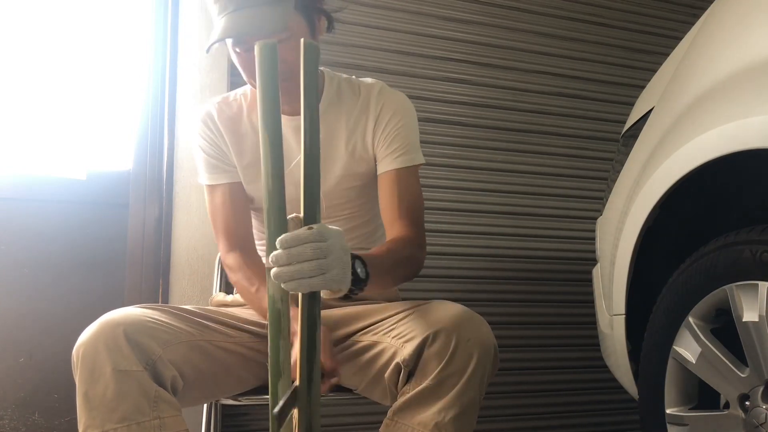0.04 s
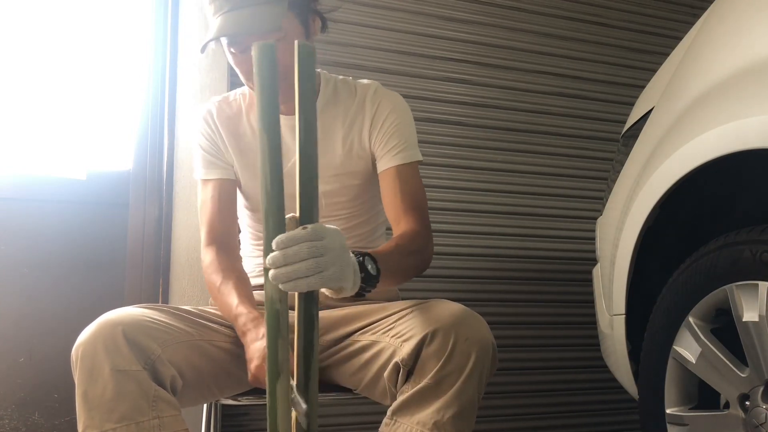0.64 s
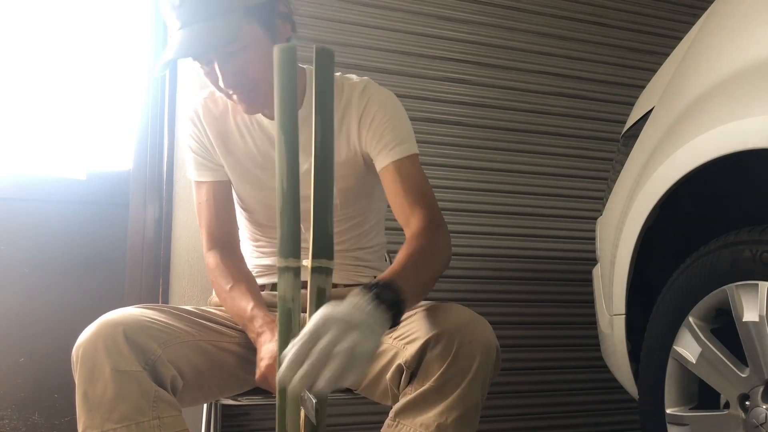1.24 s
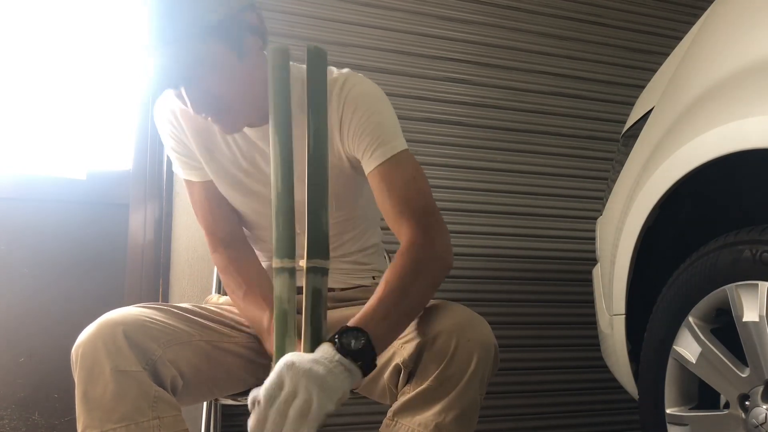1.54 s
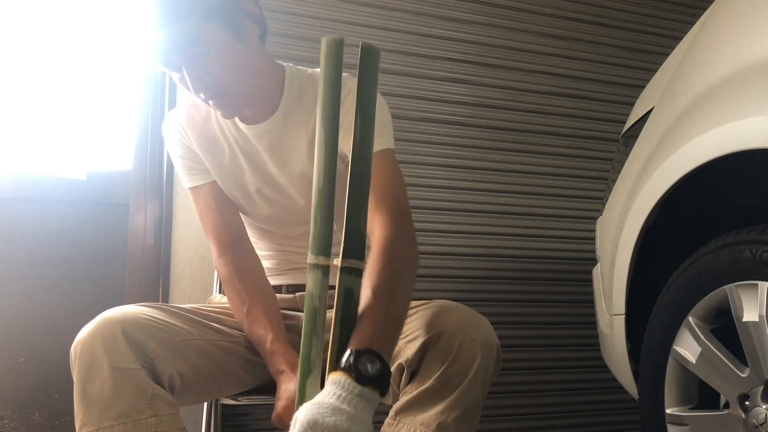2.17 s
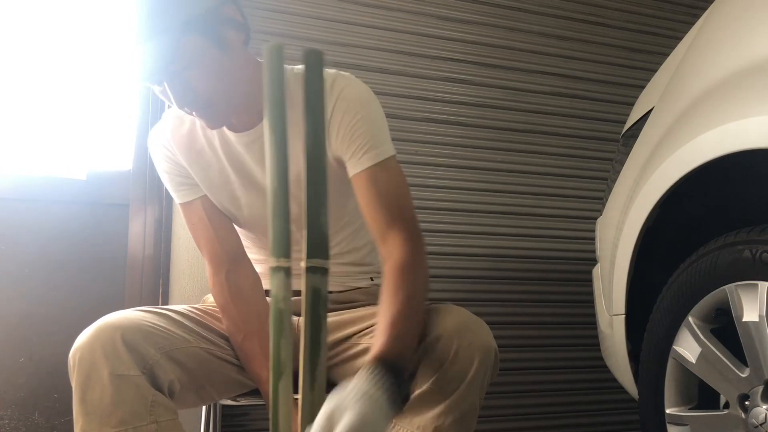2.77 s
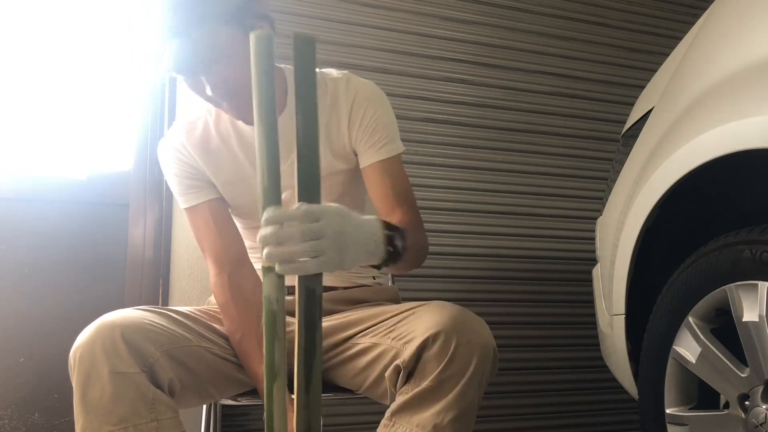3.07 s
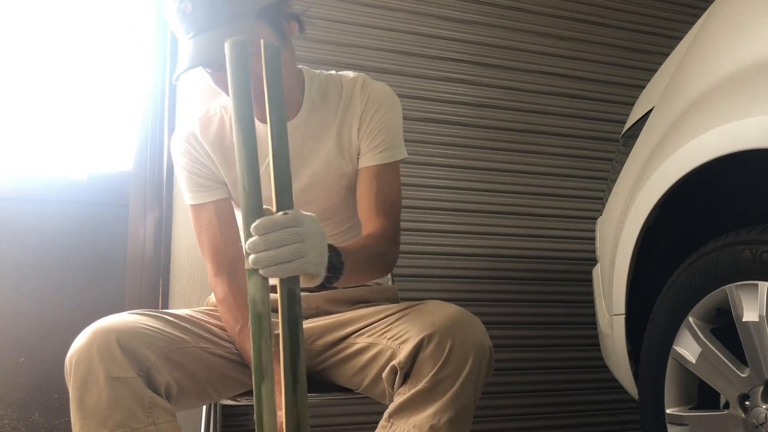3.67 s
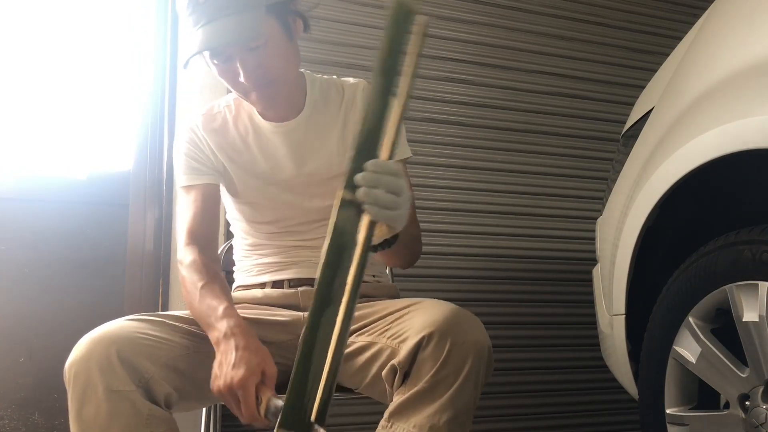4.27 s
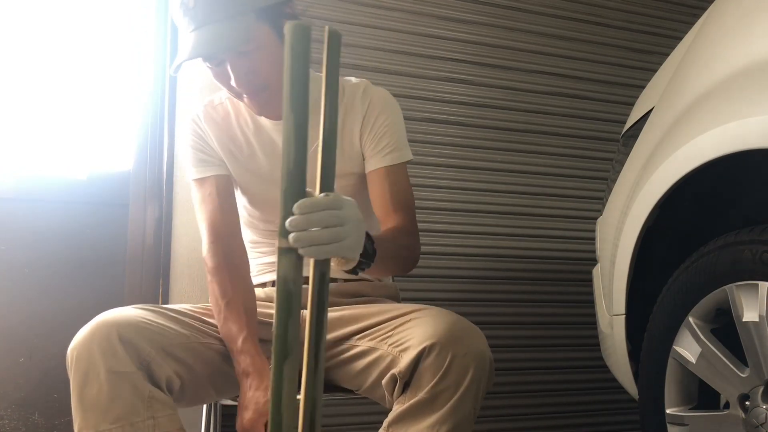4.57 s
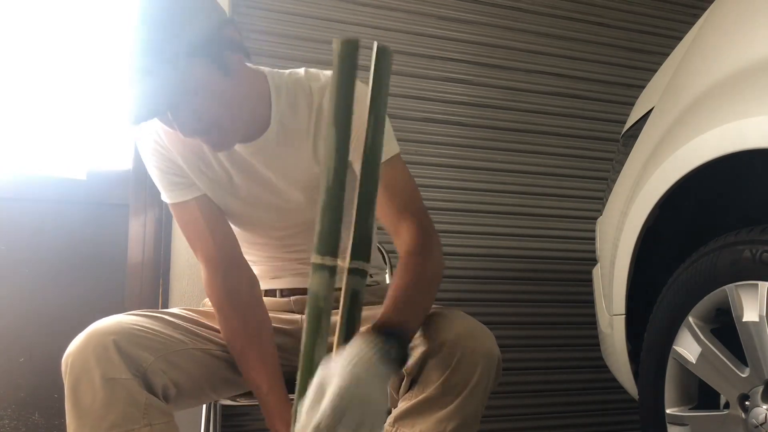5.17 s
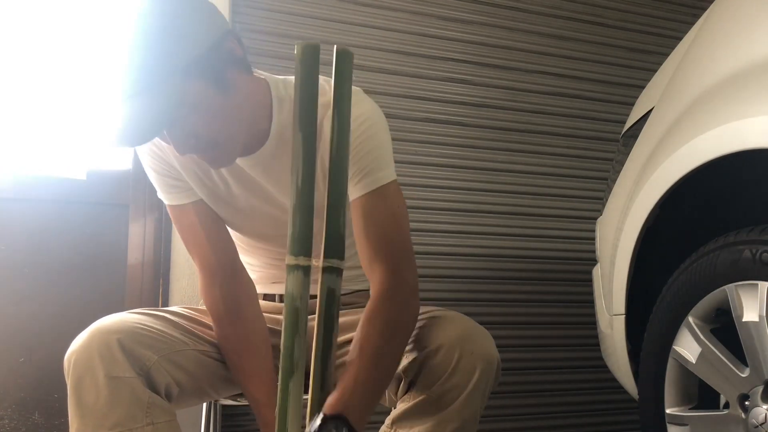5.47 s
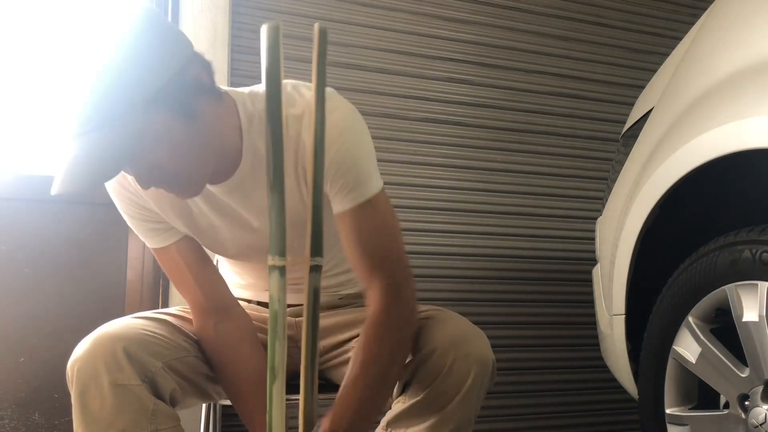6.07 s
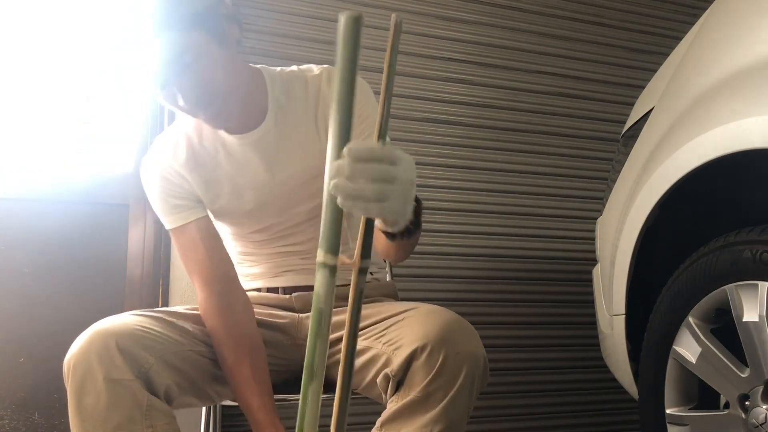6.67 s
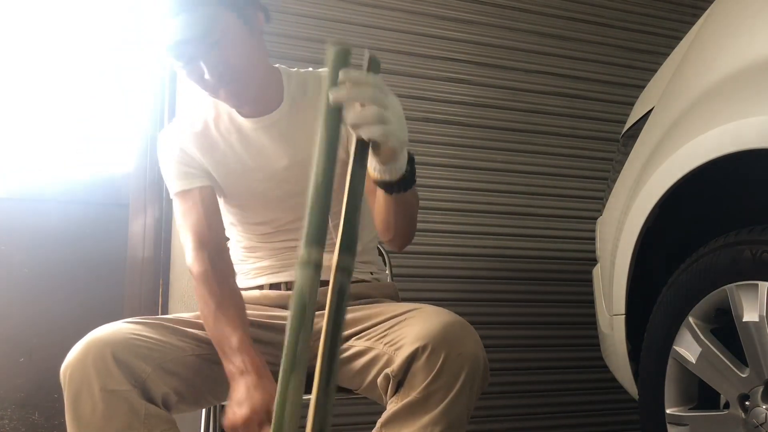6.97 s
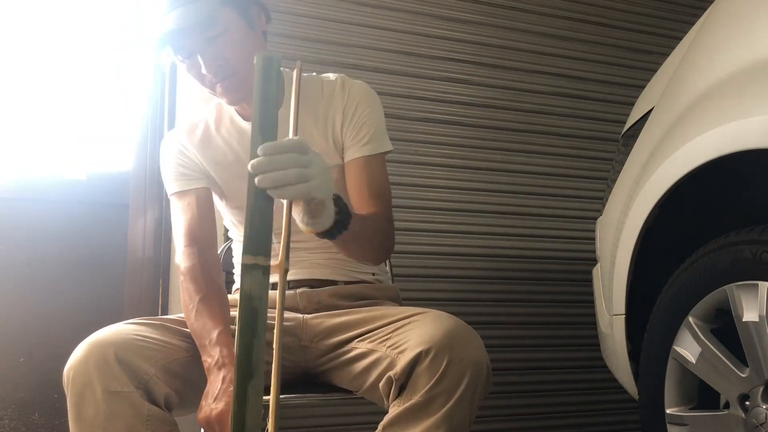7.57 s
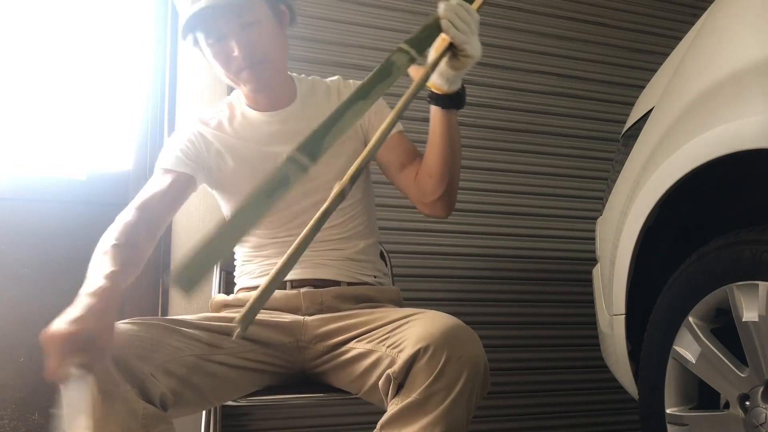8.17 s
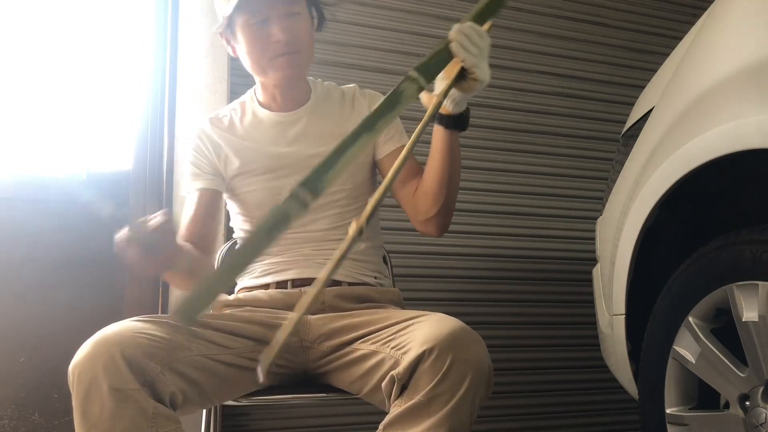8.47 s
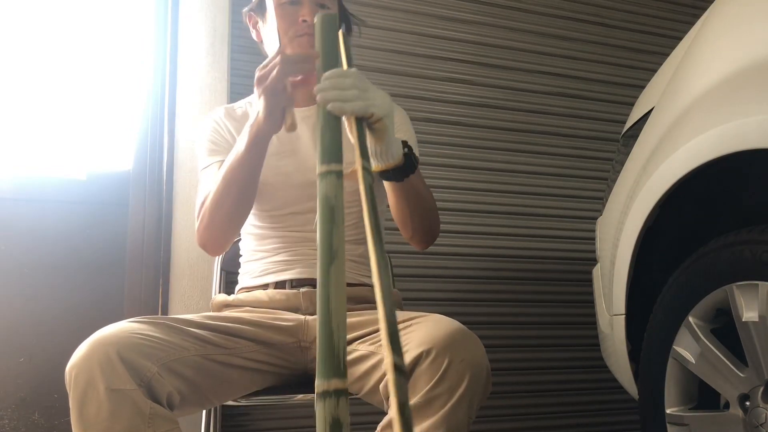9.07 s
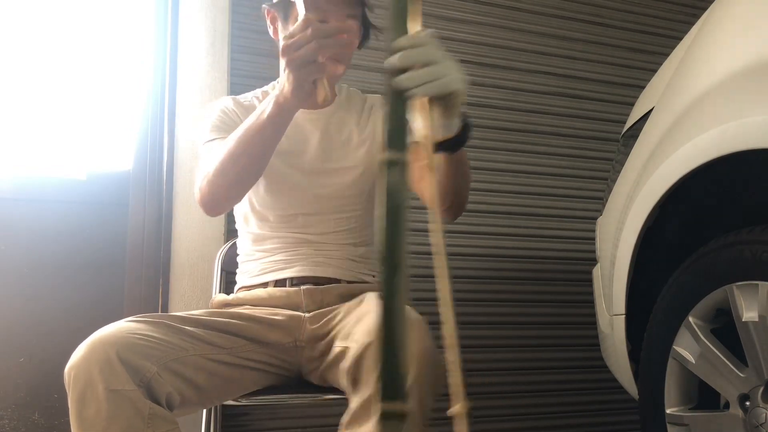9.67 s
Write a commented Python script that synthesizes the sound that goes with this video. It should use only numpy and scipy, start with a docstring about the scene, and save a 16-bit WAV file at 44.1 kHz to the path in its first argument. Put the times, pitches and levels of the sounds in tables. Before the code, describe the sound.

A green bamboo pole is split along the grain with a knife in a garage. Hollow knocks come first, then a loud crack and clusters of snapping, fizzing fibres. More knocks and soft low bumps fall between the tearing runs, with brief wet squeaks and faint glove rustles, before a few last cracks. The hard walls add a short echo over a faint rumble and machine hum.

```python
"""In a garage, a green bamboo pole is split along the grain with a knife.
Fibres tear in fizzing runs and bundles let go in sharp cracks; these and blunt knocks excite the
modes of the hollow tube. The wet faces of the split squeak by stick and slip, the foot of the pole
bumps and the grip rustles. Hard walls reflect the pole's sound over a faint rumble and machine hum."""
import sys
import numpy as np
from scipy import signal
from scipy.fft import rfft, irfft
from scipy.io import wavfile
from scipy.ndimage import uniform_filter1d

SR = 44100
rng = np.random.default_rng(int(sys.argv[2]) if len(sys.argv) > 2 else 0)


def wav_out(sig):
    """Save sig, one row per channel (or a flat mono array), as 16-bit PCM at SR to the path in sys.argv[1]."""
    wavfile.write(sys.argv[1], SR, np.round(np.clip(np.atleast_2d(sig).T, -1, 1) * 32767).astype(np.int16))


N = 433944

# spectrum of the distant rumble: f/Hz, level/dB
RUMBLE_SPECTRUM = [(20, -25), (40, -5), (75, 1.5), (115, -2.5), (180, -6.5), (290, -4), (430, -3),
                   (600, -9.5), (820, -6), (1400, -12), (2600, -21), (5000, -28), (9000, -35),
                   (15500, -36.5)]
# partials of the machine hum: f/Hz, level/dB
HUM_PARTIALS = [(59.2, -73), (251.5, -77.5), (294, -74.5)]
# blunt knocks on the pole: t/s, level/dB, thud/dB, hollow note f/Hz
KNOCKS = [(0.0, -24.5, -15.5, 730), (0.166, -22, -12.5, 1120), (0.1674, -22.5, -10.5, 1450),
          (1.641, -20.5, -9.5, 800), (2.003, -41, 0, 950), (3.059, -35.5, -2.5, 1107),
          (3.372, -41.5, 0, 870), (5.755, -25.5, 0.5, 745), (5.757, -28.5, -1.5, 560), (6.992, -33, 9, 390),
          (7.037, -27, -6, 1676), (7.057, -32, 0, 1250)]
# modes of the hollow pole: f/Hz, bandwidth/Hz, level/dB
POLE_MODES = [(522, 37, 6), (727, 67, 3.5), (869, 12, 4.5), (1070, 80, 1.5), (1452, 180, 1.5),
              (1840, 260, -3), (2460, 190, 5), (3270, 200, -0.5), (3805, 100, -0.5), (4184, 190, -1.5),
              (4795, 116, -2), (5700, 270, -4.5), (8200, 400, -2)]
# reverberation time of the garage: f/Hz, t60/s
ROOM_T60 = [(150, 0.45), (1200, 0.4745), (8000, 0.4656), (15000, 0.3)]
# strength of its echoes: f/Hz, level/dB
ROOM_SPECTRUM = [(150, 1), (500, -0.5), (1200, -4.5), (4000, -2.5), (8000, -6), (15000, -7)]
# bundles snapping: t/s, level/dB, brightness/dB (fine fibres above 0, thick below), strip note f/Hz
CRACKS = [(0.15, -51.5, 4, 1500), (1.59, -47, -1, 3480), (1.62, -43.5, 1, 2500), (1.6394, -25.5, -5, 1740),
          (1.6411, -24, 2.5, 2670), (1.702, -42, -7, 1500), (1.9976, -57.5, 1, 1500),
          (2.2294, -57.5, 0, 1540), (2.3707, -55.5, 1, 1510), (2.43, -44.5, -2, 5700),
          (2.4396, -36.5, 0.5, 1770), (2.4855, -28, -2.5, 2330), (2.503, -31, 2.5, 4170),
          (2.602, -38, 2, 4100), (2.6447, -47, 3, 1930), (2.934, -60.5, 4.5, 7100),
          (3.3482, -60, 2.5, 2360), (3.435, -44, -2, 1780), (3.472, -42, -1, 1800),
          (3.4944, -42, -1.5, 4000), (3.5175, -42.5, -2, 1950), (3.547, -40.5, -2.5, 1850),
          (3.5753, -40.5, -2.5, 4200), (5.15, -55, 6.5, 3840), (5.1768, -41, 3, 4000),
          (5.25, -53.5, 10, 6350), (5.306, -52, -2, 8000), (5.534, -59, -9.5, 1500),
          (5.6966, -43.5, 1, 4000), (5.7535, -39, 6.5, 6300), (5.8317, -45.5, -4, 3300),
          (5.987, -45.5, 4, 4400), (6.0377, -56, 8.5, 2190), (7.156, -42.5, 2, 5530),
          (7.293, -55, -2, 2010), (7.7716, -59, 6, 3500), (8.115, -38.5, -2.5, 2550),
          (8.1253, -48, -4, 2450), (8.3169, -50, -2.5, 4700)]
# the foot of the pole taking the weight: t/s, level/dB, f/Hz, t60/s
BUMPS = [(0.166, -51.5, 215, 0.18), (2.47, -49.5, 79.4, 0.46), (2.851, -47.5, 259, 0.21),
         (3.375, -52, 273, 0.33), (5.69, -55, 295, 0.16), (5.755, -53, 85, 0.27), (6.994, -59, 128, 0.5),
         (6.992, -50, 228, 0.23)]
# glove and cloth brushing the pole: t/s, duration/s, level/dB
RUSTLES = [(0.846, 0.76, -77), (6.398, 0.65, -67.5), (7.259, 0.95, -72.5), (8.204, 0.48, -71)]
# wet faces slipping: t/s, duration/s, final level/dB, f/Hz, first gap between slips/s, build-up/dB
SQUEAKS = [(1.036, .012, -61, 7700, 0.0067, 3), (1.31, 0.028, -59, 7900, 0.0086, 6),
           (1.481, 0.03, -55, 7900, 0.0077, 0), (6.298, 0.0082, -57, 2970, 0.0055, 4),
           (6.438, 0.043, -48, 2826, .0074, 8), (6.574, 0.099, -56.5, 2810, 0.011, 4)]
# runs of tearing fibres: t/s, duration/s, peak level/dB, share of the run spent building up,
# woody middle/dB, fizzy edge/dB, strip note f/Hz
TEARS = [(1.573, 0.052, -49, 0.82, 7, 3, 1310), (2.435, 0.05, -41, 0.25, -1, 5, 1440),
         (2.474, 0.049, -34, 0.079, -1, 1, 2400), (3.398, 0.12, -40, 0.17, -1, 1, 830),
         (3.497, 0.11, -47.5, 0.11, -10, 0, 809), (3.8, 0.052, -48, 0.073, 0.5, 1.5, 1750),
         (3.957, 0.13, -48, 0.91, -1, 0.5, 1080), (4.466, 0.11, -59, 0.83, -1, 2, 948),
         (4.791, 0.076, -44.5, 0.54, -3, 0.5, 2260), (4.948, 0.15, -41, 0.46, -6, 3, 1570),
         (5.092, 0.25, -58.5, 0.078, -5, 2, 3170), (5.604, 0.042, -47.5, 0.57, 0.5, -8, 1830),
         (5.689, 0.077, -46.5, 0.55, 1.5, 5, 1384), (5.762, 0.22, -58, 0.51, 6, 2, 1107),
         (6.719, 0.1, -52.5, 0.72, 5.5, 1, 990), (6.989, 0.033, -41, 0.14, 5, 3, 420),
         (8.056, 0.042, -43.5, 0.12, 3.5, 3, 2180), (8.547, 0.019, -52, .1, 4, 4, 950)]
# spectra of the three excitations: f/Hz, level/dB
KNOCK_SPECTRUM = [(60, -28), (170, -8.5), (350, 2), (620, -5.5), (1200, -4), (2200, -9), (3200, -4),
                  (5000, 3), (9000, -4), (15500, -9.5)]
CRACK_SPECTRUM = [(60, -25), (200, -12.5), (450, -12), (900, -1.5), (2000, -0.5), (3200, -3), (6000, 0.5),
                  (9000, -2), (15500, -1.5)]
TEAR_SPECTRUM = [(100, -19), (320, -10), (560, -12.5), (830, -3.5), (2000, -2), (4000, 1.5), (5500, 1),
                 (7800, -1), (9500, -4), (15500, -6.5)]

BAND_LIMIT_HZ = 16000
FIRM_DB = -40  # reference level of a firm blow


def gain_of(db):
    """Amplitude grows tenfold for every 20 dB."""
    return 10 ** (np.asarray(db) / 20)


def unit_rms(x):
    """Normalisation to a mean power of 1."""
    return x / np.sqrt(np.mean(x ** 2) + 1e-20)


def curve_at(points, hz):
    """Linear interpolation of (f/Hz, value) points on a logarithmic frequency axis."""
    f, value = np.transpose(points)
    return np.interp(np.log(hz + 1), np.log(f + 1), value)


def add(mix, start, sound):
    """Superposition: a sound joins the mix at its start time in seconds."""
    part = mix[max(round(start * SR), 0):][:len(sound)]
    part += sound[:len(part)]


def filtered(x, *curves, size=4096):
    """Minimum-phase filters in cascade: their (f/Hz, level/dB) curves add."""
    hz = abs(np.fft.fftfreq(size, 1 / SR))
    log_gain = np.log(gain_of(sum(curve_at(curve, hz) for curve in curves)))
    response = np.exp(np.conj(signal.hilbert(log_gain)))
    taps = np.fft.ifft(response).real
    return signal.fftconvolve(x, taps[:size // 2])


def resonance(centre_hz, width_share, db):
    """A Lorentzian peak added in power to a flat response, as an (f/Hz, level/dB) curve."""
    hz = np.linspace(0, SR / 2, 2049)
    detuning = 2 * (hz / centre_hz - 1) / width_share
    power = 1 + gain_of(db) ** 2 / (1 + detuning ** 2)
    return np.transpose([hz, 10 * np.log10(power)])


def band_noise(n, hz, width_hz):
    """A resonance driven by white noise passes a narrow band."""
    f = np.fft.rfftfreq(n, 1 / SR)
    spectrum = rfft(rng.standard_normal(n)) / (1 + ((f - hz) / width_hz) ** 2)
    return unit_rms(irfft(spectrum, n))


def background(rumble_db=-62, waver=0.58):
    """Steady noise gives a distant rumble; hum partials waver by beating with narrow bands of noise."""
    slope = gain_of(curve_at(RUMBLE_SPECTRUM, np.fft.rfftfreq(N, 1 / SR)))
    rumble = irfft(rfft(rng.standard_normal(N)) * slope, N)
    t = np.arange(N) / SR
    hum = sum(gain_of(db) * (np.sin(2 * np.pi * hz * t) + waver * band_noise(N, hz, width_hz=2.7))
              for hz, db in HUM_PARTIALS)
    return gain_of(rumble_db) * unit_rms(rumble) + hum


def rattle(db, firm_t60_s, doubling_db, size=8192):
    """Scattering along the pole draws a blow out into a dying rattle, longer for a lighter blow."""
    t = np.arange(size) / SR
    t60 = firm_t60_s * 2 ** ((FIRM_DB - db) / doubling_db)
    envelope = gain_of(-60 * t / max(t60, 0.004)) * (1 - np.exp(-(t / 0.0007) ** 2))
    x = rng.standard_normal(size) * envelope
    for _ in range(3):
        x = irfft(np.exp(1j * np.angle(rfft(x))))  # a sharp blow feeds all frequencies alike
        local_rms = np.sqrt(abs(uniform_filter1d(x ** 2, size=128)) + 1e-14)
        x *= envelope / local_rms
    return x / np.linalg.norm(x) * np.sqrt(SR / 100)  # the energy of 10 ms at rms 1


def knocks():
    """Impact excitation: a blunt contact sounds a hollow note, with a brighter edge the harder it is."""
    out = np.zeros(N)
    for start, db, thud_db, hz in KNOCKS:
        edge_db = -21 + 0.58 * (db - FIRM_DB)
        contact = [(400, thud_db), (900, 0), (2000, 0), (4500, edge_db)]
        blow = rattle(db, firm_t60_s=0.136, doubling_db=9.5)
        hollow_note = resonance(hz, width_share=0.2, db=6)
        add(out, start, gain_of(db) * filtered(blow, KNOCK_SPECTRUM, contact, hollow_note))
    return out


def pole(x, direct_db):
    """Modal response: the tube rings at its modes, and a direct path carries sound between them."""
    hz = np.fft.rfftfreq(16384, 1 / SR)
    modes = sum(gain_of(db) ** 2 / (1 + (2 * (hz - f) / width) ** 2) for f, width, db in POLE_MODES)
    response = np.transpose([hz, 10 * np.log10(gain_of(direct_db) ** 2 + modes)])
    wall_antiresonance = resonance(2840, width_share=0.1, db=0) * [1, -1]  # inverted: a 3 dB dip
    return filtered(x, response, wall_antiresonance, size=8192)[:N]


def garage(x, onset_s=0.0017, paths=3):
    """Reverberation: each band decays at its own rate, and the echo paths shift as the pole is moved."""
    out = np.zeros(N)
    for k in range(paths):
        hz, t, noise = signal.stft(rng.standard_normal(SR * 2 // 3), SR, nperseg=256)
        decay = gain_of(-60 * t / curve_at(ROOM_T60, hz)[:, None]) * (1 - np.exp(-(t / onset_s) ** 2))
        band_energy = (decay ** 2).sum(1, keepdims=True) * t[1] * SR
        decay *= gain_of(curve_at(ROOM_SPECTRUM, hz))[:, None] / np.sqrt(band_energy)
        tail = signal.istft(noise * decay, SR, nperseg=256)[1]
        crossfade = np.cos(np.pi * (np.arange(N) / SR / 2 + k / paths)) * np.sqrt(2 / paths)
        out += signal.oaconvolve(x * crossfade, tail)[:N]
    return out


def bundle_tone(middle_db, edge_db):
    """Source size sets the spectrum: thick bundles give a woody middle, fine fibres a bright edge."""
    return [(2100, middle_db), (3300, 0), (7000, 0), (10500, edge_db)]


def strip_modes(ripple_db, points=55):
    """Each length of freed strip has its own modes: random peaks and dips, as an (f/Hz, level/dB) curve."""
    ripple = ripple_db * np.sin(2 * np.pi * rng.random(points))
    return np.transpose([np.linspace(0, BAND_LIMIT_HZ, points), ripple])


def cracks():
    """Brittle fracture: a bundle releases its strain in one sharp snap, and the freed strip rings."""
    out = np.zeros(N)
    for start, db, bright_db, hz in CRACKS:
        bundle = bundle_tone(middle_db=-2.5 - bright_db, edge_db=bright_db)
        strip = resonance(hz, width_share=0.12, db=8), strip_modes(ripple_db=2.5)
        snap = rattle(db, firm_t60_s=0.04, doubling_db=40.5)
        add(out, start, gain_of(db) * filtered(snap, CRACK_SPECTRUM, bundle, *strip))
    return out


def bumps(width_share=0.12, rise_s=0.013):
    """Damped vibration: a low, soft bump swells and dies as the foot of the pole takes the weight."""
    out, t = np.zeros(N), np.arange(SR // 2) / SR
    for start, db, hz, t60 in BUMPS:
        envelope = gain_of(db - 60 * t / t60) * (1 - np.exp(-t / rise_s))
        add(out, start, envelope * band_noise(len(t), hz, width_share * hz))
    return out


def fibres(n, spread_db, stutter_hz, stutter_db, snaps_per_s=12000):
    """Shot noise: a dense stream of tiny snaps, bunched in strength by stick and slip at a loose rate."""
    snap_db = spread_db * np.minimum(rng.exponential(1, n), 4)
    bunching_db = stutter_db * band_noise(n, stutter_hz, stutter_hz / 2)
    polarity = rng.choice([-1, 1], n)
    snapping = rng.random(n) < snaps_per_s / SR
    return unit_rms(gain_of(snap_db + bunching_db) * polarity * snapping)


def rustles():
    """Sliding friction: the grip shifts in faint, uneven scrapes and ticks."""
    out = np.zeros(N)
    for start, duration, db in RUSTLES:
        n = round(duration * SR)
        scrape = fibres(n, spread_db=3.5, stutter_hz=30.2, stutter_db=4) * signal.windows.tukey(n, 0.2)
        add(out, start, gain_of(db) * filtered(scrape, TEAR_SPECTRUM))
    return out


def squeaks(slip_rise_s=0.0015, slowing=1.22, width_share=0.075, overtone_db=-8, uneven_db=2.5):
    """Stick-slip friction: short hoarse chirps with overtones come ever slower as the strain builds."""
    out, t = np.zeros(N), np.arange(1024) / SR
    swell = t / slip_rise_s * np.exp(1 - t / slip_rise_s)
    for start, duration, db, hz, gap, build_db in SQUEAKS:
        elapsed = 0
        while elapsed < duration:
            slip_db = db - build_db * (1 - elapsed / duration) + uneven_db * rng.standard_normal()
            rasp = sum(gain_of(overtone_db * (k > 1)) * band_noise(len(t), k * hz, k * k * hz * width_share)
                       for k in (1, 2, 3) if k * hz < SR / 2)
            add(out, start + elapsed, gain_of(slip_db) * swell * rasp / np.sqrt(2))
            elapsed += gap
            gap *= slowing
    return out


def tears(build_db=8.5, fall_db=6, width_share=0.15, ring_db=7, overtone_db=-1.6, sag=0.04):
    """Crack propagation: parting fibres fizz and ring the strip, whose notes sag as it grows longer."""
    out = np.zeros(N)
    for start, duration, db, build_share, middle_db, edge_db, hz in TEARS:
        progress = np.arange(0, duration, 1 / SR) / duration
        force = gain_of(db - np.interp(progress, [0, build_share, 1], [build_db, 0, fall_db]))
        stream = force * fibres(len(progress), spread_db=2, stutter_hz=380, stutter_db=2.5)
        spectra = TEAR_SPECTRUM, bundle_tone(middle_db, edge_db), strip_modes(ripple_db=1.5)
        # the higher note fades into the lower
        for share, note_hz in (1 - progress, hz * (1 + sag)), (progress, hz * (1 - sag)):
            strip = [resonance(k * note_hz, width_share / k, ring_db + overtone_db * k)
                     for k in range(1, 7)]
            add(out, start, filtered(share * stream, *spectra, *strip))
    return out


def scene():
    """Superposition of the bamboo, its echoes, the bumps and the background in one channel."""
    splitting = pole(cracks() + tears(), direct_db=0)  # surface snaps pass freely between the modes
    knocking = pole(knocks(), direct_db=-3.5)  # blows on the whole tube pass less
    bamboo = splitting + knocking + squeaks() + rustles()
    return (bamboo + garage(bamboo) + bumps() + background())[None]


def record(dry):
    """Band limiting: a linear-phase low-pass filter removes the highest treble."""
    lowpass = signal.firwin(401, BAND_LIMIT_HZ, window=("kaiser", 8), fs=SR)
    return signal.oaconvolve(dry, lowpass[None], "same")


dry = scene()
out = record(dry)
wav_out(out)
```